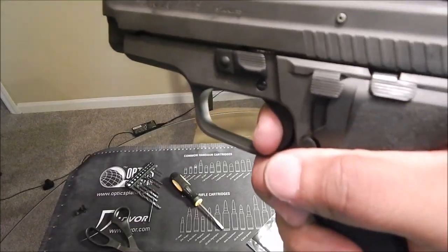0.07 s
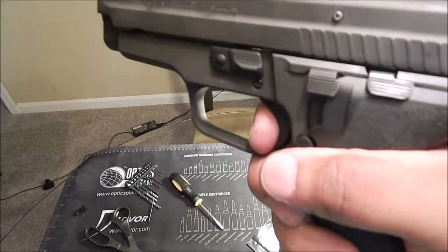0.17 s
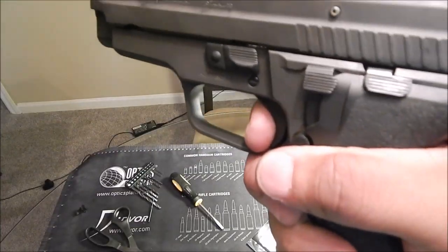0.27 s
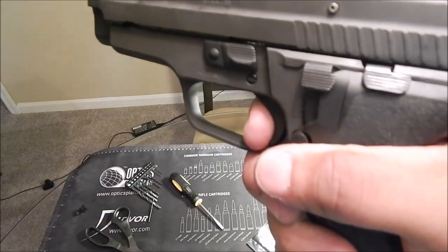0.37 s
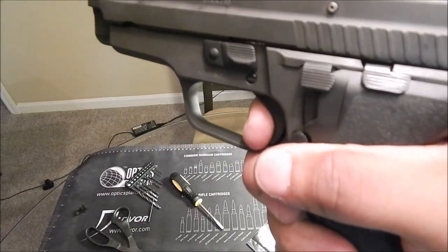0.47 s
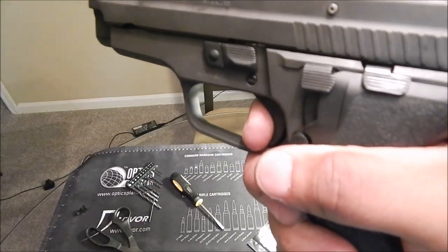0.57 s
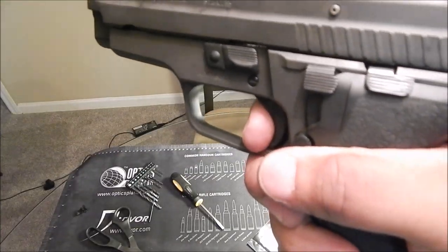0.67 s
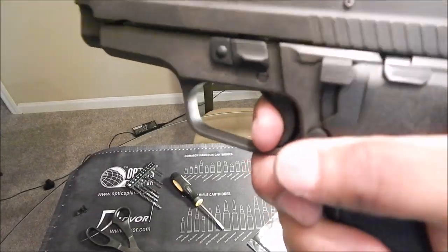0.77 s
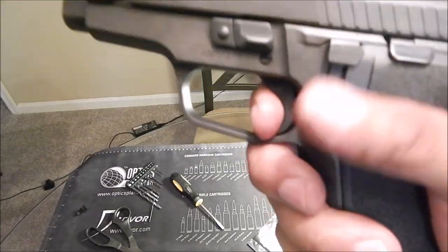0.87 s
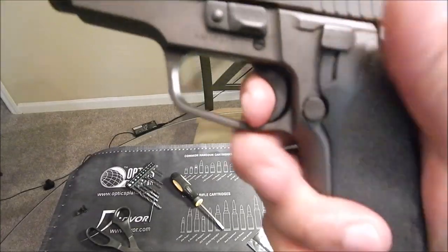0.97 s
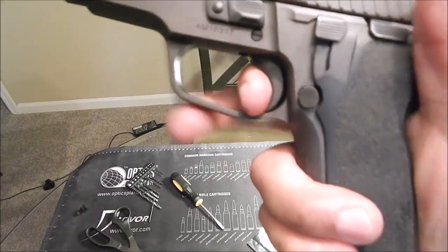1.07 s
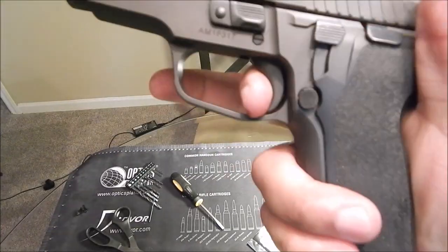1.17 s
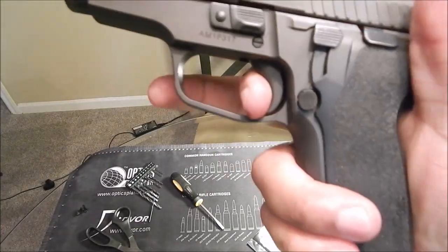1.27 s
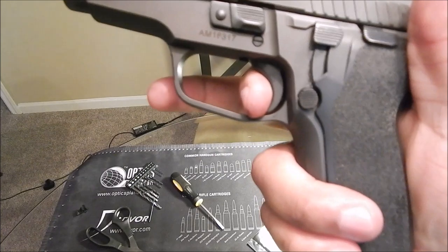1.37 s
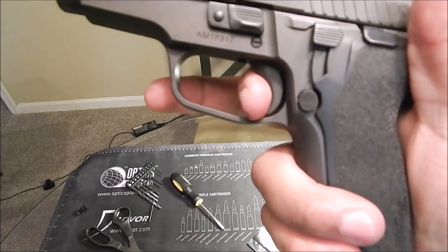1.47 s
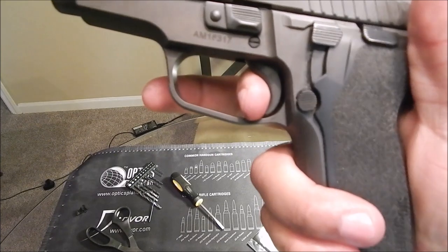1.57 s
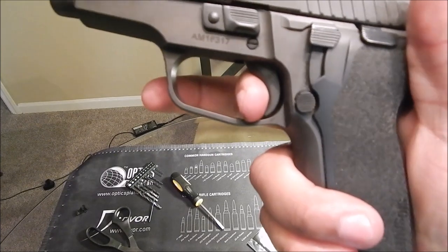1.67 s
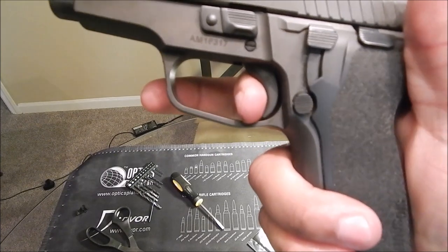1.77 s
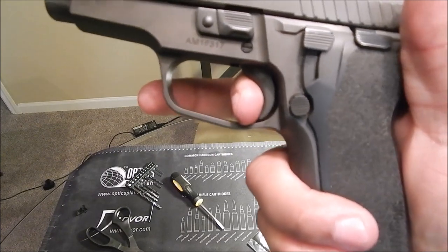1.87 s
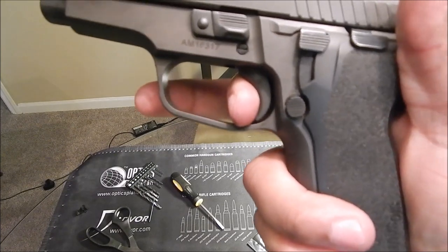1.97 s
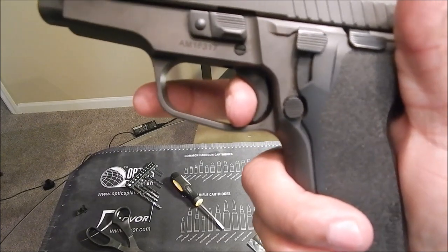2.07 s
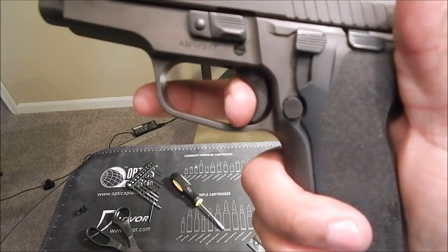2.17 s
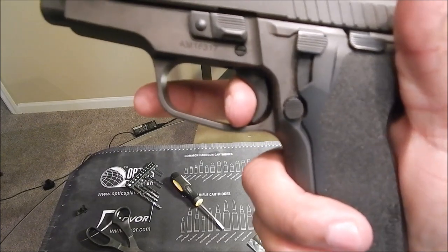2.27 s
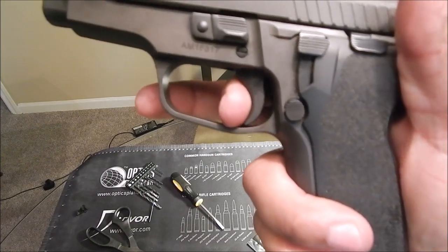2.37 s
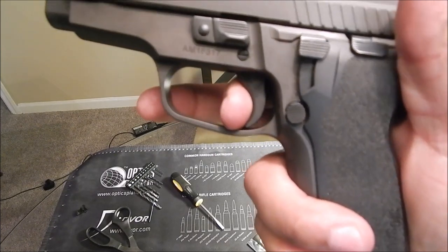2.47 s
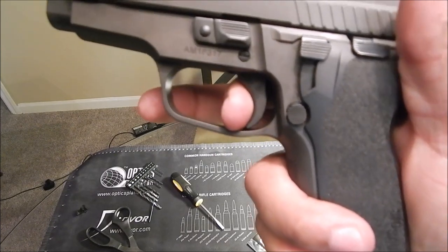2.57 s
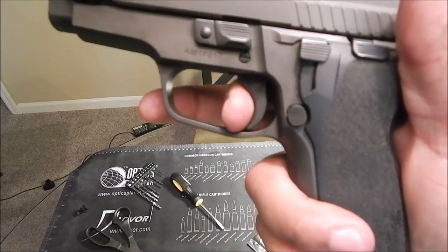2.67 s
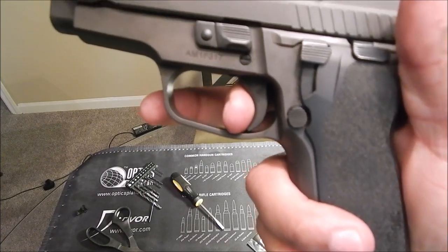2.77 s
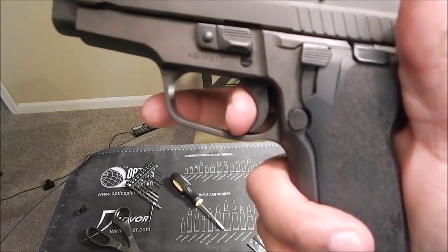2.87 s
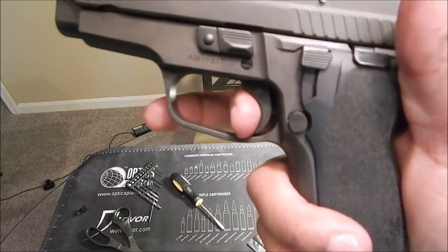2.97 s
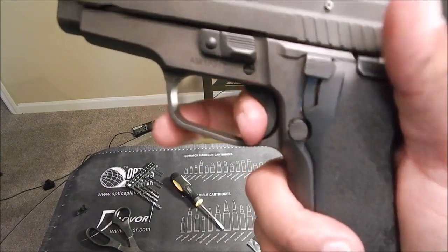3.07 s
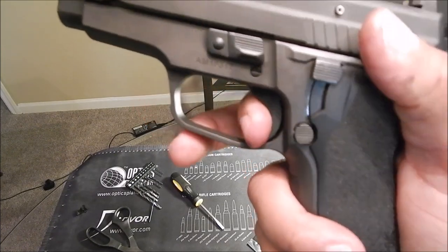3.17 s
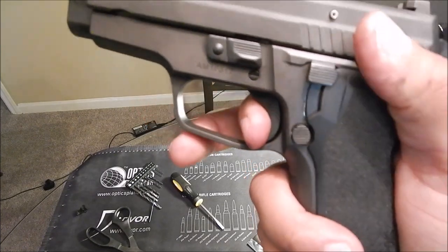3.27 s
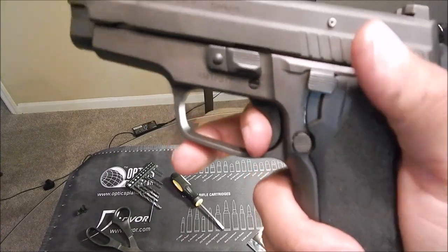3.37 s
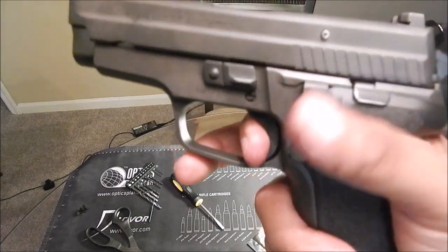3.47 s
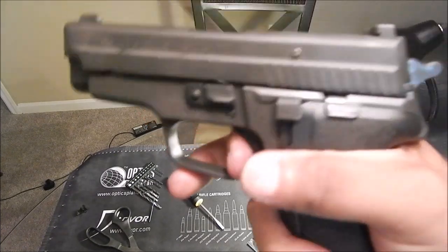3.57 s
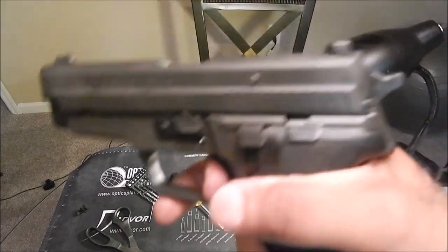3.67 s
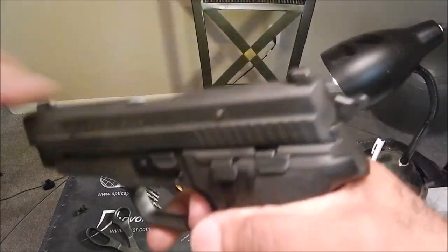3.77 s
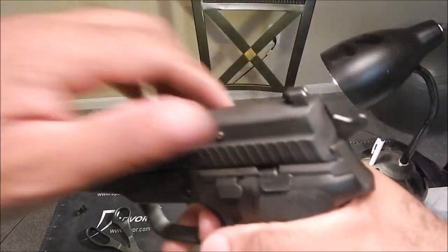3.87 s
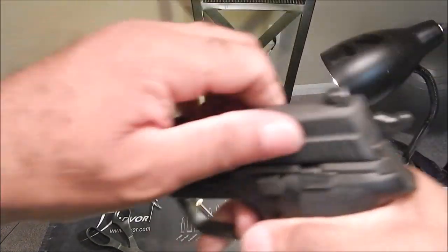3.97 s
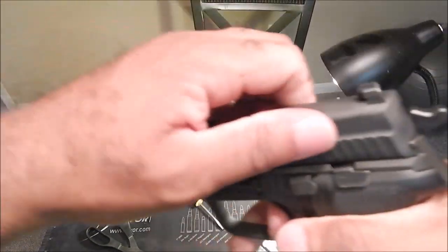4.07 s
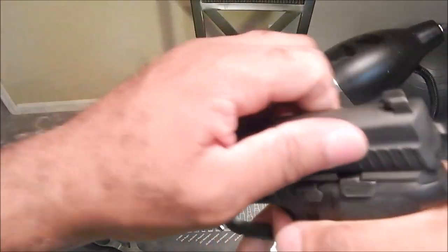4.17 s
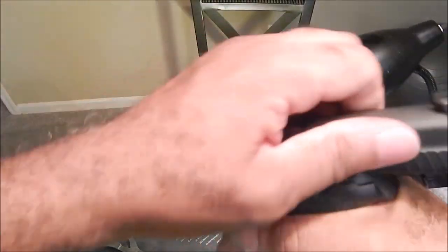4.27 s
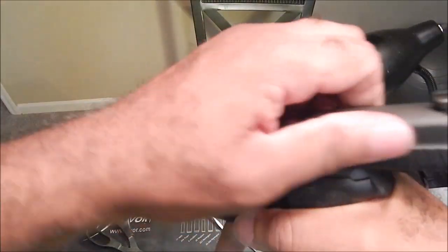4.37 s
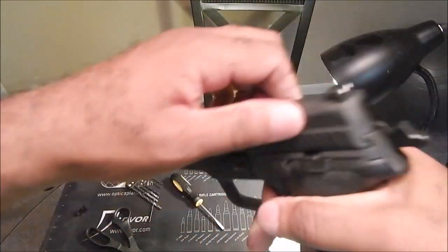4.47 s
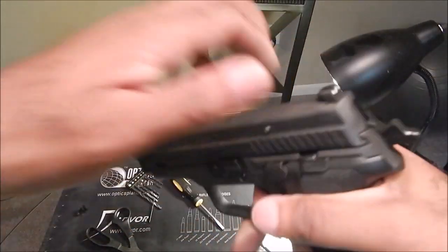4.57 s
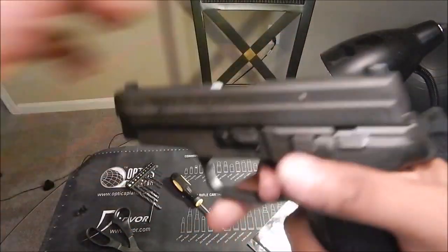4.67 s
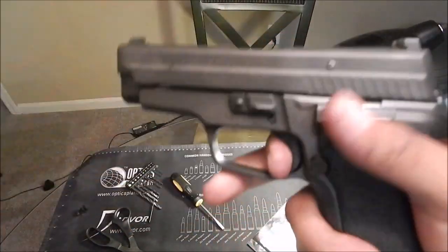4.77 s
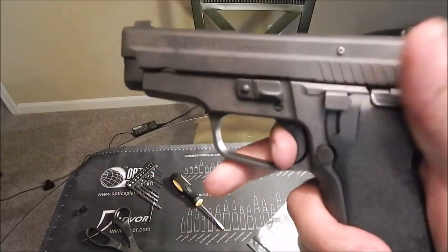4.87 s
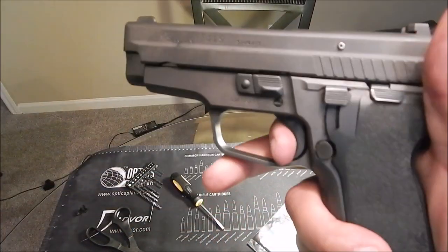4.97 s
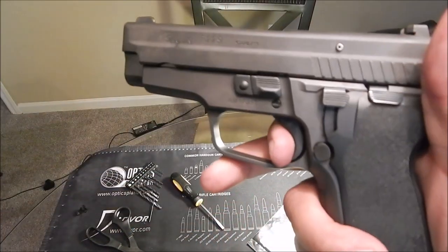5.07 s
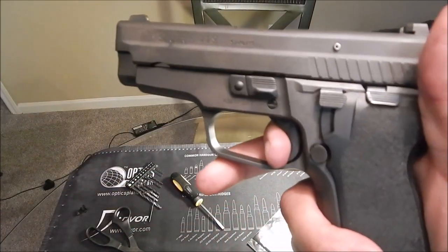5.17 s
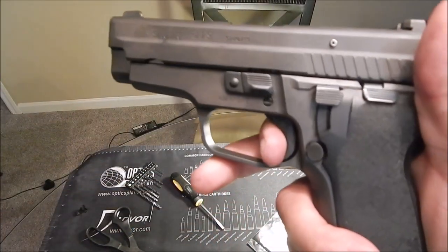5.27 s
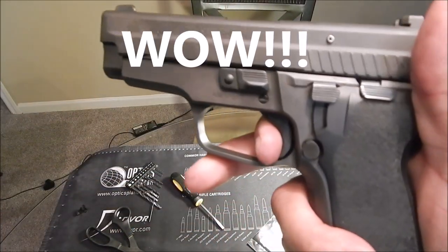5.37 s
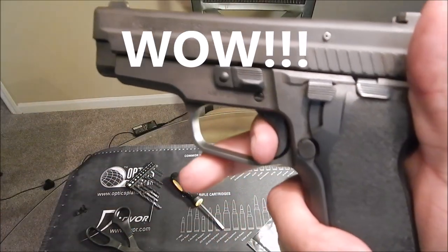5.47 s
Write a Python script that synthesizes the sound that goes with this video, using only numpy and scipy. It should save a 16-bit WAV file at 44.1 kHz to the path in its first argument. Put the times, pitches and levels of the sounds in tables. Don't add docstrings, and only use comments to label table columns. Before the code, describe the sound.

A stereo close-up of a pistol being dry-fired and racked in a small carpeted room. Low ventilation rush, a steady low hum and faint hiss slowly rise during the opening second. A soft, textured palm rub comes at 0.9 to 1.0 s, then fainter dragging from 1.4 to 2.2 s. At 2.27 s the hammer falls: a very sharp, dry steel crack with tight double contact and short room tail. A tiny trigger reset click follows at 2.93 s, then a second crack at 3.06 s, with more bounces, small late ticks and fuller ringing. The background drops sharply afterward. From 4.16 s the slide knocks and rattles backward, slams into its stop at 4.29 s, scrapes faintly while held, and snaps shut at 4.47 s with bright metallic ringing. A barely audible finger touch fades from 4.6 to 4.95 s as the quiet room sound creeps back.

```python
import sys
import numpy as np
from scipy import signal
from scipy.fft import rfft, irfft
from scipy.io import wavfile
from scipy.ndimage import uniform_filter1d, minimum_filter1d

SR = 44100
rng = np.random.default_rng(int(sys.argv[2]) if len(sys.argv) > 2 else 0)


def put_to_file(sound):
    columns = np.atleast_2d(sound).T
    safe = np.clip(columns, -1, 1)
    whole_steps = np.round(safe * 32767)
    wavfile.write(sys.argv[1], SR, whole_steps.astype(np.int16))


def makeup_ratio(level_db):
    decades = np.asarray(level_db, float) / 20
    return 10 ** decades


N = 243431
TIME = np.arange(N) / SR

CONTACT_S = [
    [2.2725, 2.2731, 2.2752, 2.284],
    [2.9262],
    [3.0623, 3.0635, 3.0656, 3.0675, 3.0735, 3.098, 3.108],
    [4.1645, 4.1958, 4.1985, 4.2035, 4.2615],
    [4.2936, 4.2958, 4.2985],
    [4.4653, 4.4672, 4.4695],
]


def pistol():
    fall_a_s, reset_s, fall_b_s, back_s, stop_s, home_s = CONTACT_S
    out = hammer_fall_a(fall_a_s)
    out += trigger_reset(reset_s)
    out += hammer_fall_b(fall_b_s)
    out += slide_back(back_s)
    out += slide_stop(stop_s)
    out += slide_home(home_s)
    return out + scrapes()


# [f/Hz, level/dB, t60/s]
FALL_A_HITS = [
    (-16.5, 14, 1.5, 1.5),
    (-15, 5.6, 5.5, 0),
    (-26.5, 30, -2.5, -1),
    (-34.5, 20, -3.5, 1),
]
FALL_A_TONE = [(350, -34.5), (600, -8), (1090, -12), (1670, -7.5), (2300, -4), (3400, -3.5), (3960, -4),
               (5290, -6), (5910, -13), (7700, -12), (12000, -9.5), (15800, -20.5), (16500, -40)]
FALL_A_TAIL = [(530, -36), (900, -15), (1050, -4), (1750, -10.5), (1950, -5.5), (3910, -1), (5610, -8.5),
               (11600, -5), (16000, -16.5)]
FALL_A_MODES = [(1060, -19, 0.016), (2118, 4, 0.032), (3780, -7, 0.025), (5000, -11, .03),
                (11500, -17, 0.018)]


def hammer_fall_a(times_s):
    return blow(times_s, FALL_A_HITS, FALL_A_TONE, FALL_A_TAIL, FALL_A_MODES,
                ring_db=-14.5, wet_db=-32.5, stretch=0.94)


RESET_HITS = [
    (-50.5, 23, -1, 0),
]
RESET_TONE = [(880, -28), (1500, -2), (4570, -17), (5200, -8), (8260, -22), (12100, -13), (16500, -31)]


def trigger_reset(times_s):
    return blow(times_s, RESET_HITS, RESET_TONE, FALL_B_TAIL, [], ring_db=-40, wet_db=-27.5, stretch=0.57)


FALL_B_HITS = [
    (-16.5, 11, -1.5, -0.5),
    (-15, 3.8, -1.5, 2),
    (-22, 24, -1, -3),
    (-21.5, 11, -6, 4.5),
    (-34.5, 14, -5, 0),
    (-39, 27, -3, 2),
    (-38, 16, -3, 0.5),
]
FALL_B_TONE = [(150, -38), (250, -8), (1470, -4.5), (1940, -7.5), (2160, -3), (3290, -4.5), (3780, 2.5),
               (4130, -5), (5190, -2.5), (8330, -8.5), (11200, -2.5), (15100, -12), (16500, -23)]
FALL_B_TAIL = [(290, -53), (500, -29), (530, -12), (868, -16.5), (1080, -14.5), (2190, -4), (5550, -5.5),
               (10500, -0.5), (16000, -10.5)]
FALL_B_MODES = [(414, -8, 0.02), (1060, -8.5, .1), (1440, -1.5, 0.023), (1793, -4.5, .025),
                (2140, -1.5, 0.05), (2302, -11, 0.11), (3637, -1, 0.03), (10000, -2, 0.044)]


def hammer_fall_b(times_s):
    return blow(times_s, FALL_B_HITS, FALL_B_TONE, FALL_B_TAIL, FALL_B_MODES,
                ring_db=-20, wet_db=-34.0, stretch=0.91)


BACK_HITS = [
    (-41.5, 25, -1.5, -1.8),
    (-19, 10, -5.5, -0.5),
    (-30, 59, 5.5, 0.83),
    (-27.5, 11, -17, -0.81),
    (-31, 29, -6, 4.5),
]
BACK_TONE = [(180, -41), (300, -14), (1580, -8.5), (1870, -5.5), (2520, -11.5), (3770, -6.5), (5830, -6),
             (6450, -6.5), (7380, -5.5), (8160, -10.5), (11800, -1.5), (15400, -21.5), (16500, -28)]
BACK_TAIL = [(290, -44.5), (500, -10.5), (1870, -0.5), (2040, -5), (3750, 0), (5470, -9), (7100, 0.5),
             (14200, -4), (16000, -19)]
BACK_MODES = [(1900, -8, 0.078), (7160, -5, 0.092), (7350, -5.5, 0.09), (10140, 6.5, .03)]


def slide_back(times_s):
    return blow(times_s, BACK_HITS, BACK_TONE, BACK_TAIL, BACK_MODES,
                ring_db=-16.5, wet_db=-25.5, stretch=1.0)


STOP_HITS = [
    (-16, 18, -4, -0.83),
    (-31, 5.6, -4, -0.4),
    (-34, 38, -2, 1),
]
STOP_TONE = [(290, -49), (500, -15), (753, -12), (1050, -12), (1590, -6.5), (1840, -3), (2160, -6.5),
             (3770, 2.5), (4970, -21.5), (7270, -3.5), (12000, -5), (15300, -16), (16500, -40.5)]
STOP_TAIL = [(290, -41.5), (500, -12), (868, -11.5), (1770, -1), (2100, -5), (2980, -5), (10200, -6.5),
             (14200, -9.5), (16000, -42.5)]
STOP_MODES = [(384, -13.5, 0.028), (1080, -7.5, 0.13), (1400, -5, 0.067), (1842, -4.5, .04),
              (2480, -6, 0.029), (3140, 1, 0.046), (3870, -2.5, .04), (7170, -6.5, 0.095),
              (9250, -3.5, .06), (10400, -2, 0.021)]


def slide_stop(times_s):
    return blow(times_s, STOP_HITS, STOP_TONE, STOP_TAIL, STOP_MODES,
                ring_db=-18, wet_db=-25.5, stretch=0.82)


HOME_HITS = [
    (-20, 20, -11, 0.9),
    (-26, 4.9, 11, 0.93),
    (-24.5, 35, -3.5, -1),
]
HOME_TONE = [(260, -27.5), (450, 0.5), (1050, -9), (1250, -13.5), (2360, 1.5), (3710, -4.5), (4720, -0.5),
             (5170, -9.5), (6990, 1), (8760, -2), (9740, 0.5), (15800, -12), (16500, -34)]
HOME_TAIL = [(290, -46.5), (500, -20), (659, 1), (729, -17.5), (1050, 2), (4730, -4.5), (5090, -6),
             (9770, 1), (16000, -12)]
HOME_MODES = [(400, -5.5, .025), (1340, -5, 0.14), (1540, -17.5, .3), (4830, -3, 0.05), (7040, 5.5, .05),
              (7160, -20, .25), (10070, -3, .05)]


def slide_home(times_s):
    return blow(times_s, HOME_HITS, HOME_TONE, HOME_TAIL, HOME_MODES,
                ring_db=-18, wet_db=-28.5, stretch=0.92)


# [start t/s, landing t/s, start level/dB, landing level/dB]
SCRAPES = [
    (2.259, 2.271, -44.5, -39.5),
    (3.05, 3.061, -42, -39),
    (4.135, 4.16, -77, -66.5),
    (4.166, 4.194, -50, -41),
    (4.262, 4.269, -44.5, -44),
    (4.36, 4.448, -57, -56.5),
    (4.452, 4.464, -42.5, -39.5),
]
# [f/Hz, level/dB per Hz]
SCRAPE_TONE = [(240, -38.5), (400, -8.5), (1390, -2.5), (3650, -5), (4070, -8), (4530, -4.5), (10200, -5.5),
               (15500, -11.5), (16500, -29)]


def scrapes():
    gain = strokes(SCRAPES, rise_db_s=2200, fall_db_s=7000)
    return gain * diffuse(N + 1, SCRAPE_TONE, spiky_db=2.0)[:, :N]


def blow(times_s, hits, tone, tail, modes, ring_db, wet_db, stretch):
    start, size, brief = int(times_s[0] * SR), 24576, 4096
    sound, ticks = np.zeros((2, size)), np.zeros(size)
    for s, (db, t60_ms, pan_db, tilt_db) in zip(times_s, hits):
        at = int(s * SR) - start
        t60_ms = max(t60_ms, 1)
        tilted = [(hz, d + tilt_db * np.log2(hz / 4000)) for hz, d in tone]
        level_db = db - 2.5 + np.array([[pan_db], [-pan_db]]) / 2
        sound[:, at:at + brief] += colour(chatter(brief, t60_ms), tilted) * makeup_ratio(level_db)
        ticks[at + 8] = makeup_ratio(db) * np.sqrt(t60_ms / 15)
    sound += ringing(ticks, modes, ring_db)
    out = np.zeros((2, N + size))
    out[:, start:start + size] = sound + makeup_ratio(wet_db) * room(ticks, tail, stretch)
    return out[:, :N]


def chatter(size, t60_ms):
    age_s = np.arange(size) / SR
    direct = rng.standard_normal(size) * makeup_ratio(0.67 * rng.exponential(size=size))
    noise = 0.69 * np.array([np.roll(direct, 2), direct])
    noise = noise + 0.82 * diffuse(size, [(100, 0.0054), (16000, 0.0022)])
    out = (1 - np.exp(-age_s / 0.00015)) * makeup_ratio(-60e3 * age_s / t60_ms) * noise
    out[:, [10, 8]] += 0.73 * np.eye(2)
    return out


def ringing(ticks, modes, ring_db):
    out = np.zeros((2, len(ticks)))
    for hz, db, t60_s in modes:
        pole = np.exp(2j * np.pi * hz / SR - np.log(1000) / (t60_s * SR))
        phase = np.exp(2j * np.pi * rng.random((2, 1)) * min(hz / 12000, .45))
        out += makeup_ratio(ring_db + db) * (phase * signal.lfilter([1], [1, -pole], ticks)).imag
    return out


# [f/Hz, t60/s]
ROOM_T60 = [(250, 0.14), (700, 0.49), (1500, 0.51), (3000, 0.58), (6000, 0.52), (10000, 0.44),
            (13000, 0.41), (16000, .2)]


def room(ticks, tail, stretch):
    size = len(ticks)
    spectrum, out = rfft(diffuse(size, tail)), 0
    ripple = uniform_filter1d(rng.standard_normal(size // 2 + 1), size=40)
    spectrum = spectrum * makeup_ratio(2.6 * unit(ripple))
    octave = np.log2(np.arange(size // 2 + 1) * SR / size + 1)
    t = np.arange(size) / SR
    onset = ((1 - np.exp(-t / 0.00059)) * (1 + 1.3 * np.exp(-t / 0.018))) ** 2
    onset = onset * makeup_ratio(25 * t)
    for centre in np.arange(8, 14.4, 1 / 3):
        window = np.cos(np.pi / 2 * np.clip(3 * (octave - centre), -1, 1)) ** 2
        band = irfft(spectrum * window, size)
        t60_s = (.92 + .16 * rng.random()) * stretch * on_log(2 ** centre, ROOM_T60)
        decay = onset * makeup_ratio(-120 * t / t60_s)
        power = 0
        for at in np.flatnonzero(ticks):
            power = power + np.roll(decay, at) * (np.arange(size) >= at) * ticks[at] ** 2
        out = out + band * np.sqrt(power)
    return out


# [start t/s, end t/s, start level/dB, end level/dB]
PALM = [
    (.865, 1.035, -61.5, -61.5),
    (1.38, 1.4, -68, -77),
    (1.45, 1.7, -73, -73),
    (1.7, 2.24, -72, -69),
]
FINGER = [
    (3.405, 3.435, -80.5, -87.5),
    (4.62, 4.95, -74, -84.5),
]
# [f/Hz, level/dB per Hz]
PALM_TONE = [(600, -26), (1200, 2.5), (3000, 0), (8000, -5), (12000, -5), (16000, -10.5)]


def hands():
    rise_db_s, lift_db_s = 550, 310.5
    finger_tone = [(700, -36), (1000, -8.5), (2100, -9), (2800, -18), (4500, -61)]  # f/Hz, level/dB per Hz
    palm_gain = strokes(PALM, rise_db_s, lift_db_s) * makeup_ratio(1.1 * walk(40))
    palm = palm_gain * diffuse(N + 1, PALM_TONE)[:, :N]
    return palm + strokes(FINGER, rise_db_s, lift_db_s) * diffuse(N + 1, finger_tone)[:, :N]


# [f/Hz, level/dB per Hz]
VENT_TONE = [(15, -56.5), (25, -26.5), (53, -25), (104, -2), (119, -7), (130, -4.5), (184, -18), (231, -17),
             (265, -21), (291, -18), (401, -13.5), (516, -23.5), (579, -24.5), (2040, -35), (6000, -52),
             (7800, -86), (13200, -120)]


def ventilation():
    hum_hz, hum_db, vent_db = 120.6, -44, -42.5
    hum = np.sqrt(2) * np.sin(2 * np.pi * hum_hz * TIME + 0.1 * walk(3.7))
    hum = hum * makeup_ratio(hum_db + 0.65 * walk(4) + 2.0 * walk(16))
    return makeup_ratio(vent_db - 3.5 + 0.59 * walk(1.6)) * diffuse(N + 1, VENT_TONE)[:, :N] + hum


# [f/Hz, level/dB per Hz]
HISS_TONE = [(1000, -8.5), (4000, -5), (8000, 0), (12000, -3), (16000, -7)]


def hiss():
    return makeup_ratio(-74) * diffuse(N + 1, HISS_TONE)[:, :N]


# [t/s, level/dB]
DUCKS = [
    (0, -15.5),
    (2.299, -15.5),
    (3.1, -35.5),
    (4.225, -23.5),
    (4.5, -34),
]


def gain_control():
    creep_db_s, duck_db_s = 17.5, 699.5
    dips = [db + np.where(TIME > s, creep_db_s * (TIME - s), duck_db_s * (s - TIME)) for s, db in DUCKS]
    return makeup_ratio(np.minimum(np.min(dips, axis=0), 0))


def brief_dip(blow_s):
    dip_db, from_s, until_s, slope_db_s = -9, .0062, .0026, 4500
    away_s = np.maximum(blow_s - from_s - TIME, TIME - blow_s + until_s)
    return makeup_ratio(np.minimum(dip_db + slope_db_s * np.maximum(away_s, 0), 0))


def strokes(rows, rise_db_s, fall_db_s):
    levels_db = []
    for start_s, end_s, start_db, end_db in rows:
        drift_db = np.interp(TIME, [start_s, max(end_s, start_s + 1e-4)], [start_db, end_db])
        rise_db = rise_db_s * np.clip(start_s - TIME, 0, None)
        fall_db = fall_db_s * np.clip(TIME - end_s, 0, None)
        levels_db.append(drift_db - rise_db - fall_db)
    return makeup_ratio(np.max(levels_db, axis=0).clip(-200))


# [f/Hz, likeness/1]
LIKENESS = [(60, 1), (130, 0.97), (290, 0.91), (640, 0.79), (1410, 0.5), (3100, 0.2), (6820, -0.11),
            (15000, 0.4)]


def diffuse(size, tone, spiky_db=0.):
    hz = np.arange(size // 2 + 1) * SR / size
    alike = np.clip(on_log(hz, LIKENESS), -.99, .99)
    mid, side = rfft(rng.standard_normal((2, size)) * makeup_ratio(spiky_db * rng.exponential(size=size)))
    mid, side = mid * np.sqrt(1 + alike), side * np.sqrt(1 - alike)
    return unit(irfft(np.array([mid + side, mid - side]) * makeup_ratio(on_log(hz, tone)), size))


def colour(x, tone):
    cep = irfft(np.log(makeup_ratio(on_log(np.arange(1025) * SR / 2048, tone))))
    cep[1:1024] *= 2
    cep[1025:] = 0
    taps = irfft(np.exp(rfft(cep)))[:1024]
    taps = taps / np.linalg.norm(taps)
    return signal.fftconvolve(x, taps[None], axes=1)[:, :x.shape[1]]


def walk(rate_hz):
    k = int(SR / rate_hz)
    steps = np.repeat(rng.standard_normal(N // k + 1), k)
    return unit(uniform_filter1d(uniform_filter1d(steps, k), k)[:N])


def on_log(hz, table):
    table_hz, value = np.array(table).T
    return np.interp(np.log(hz + 1), np.log(table_hz), value)


def unit(x):
    return x / np.sqrt(np.mean(x ** 2))


def scene():
    slide_stop_s = CONTACT_S[4][0]
    return brief_dip(slide_stop_s) * pistol() + hands() + gain_control() * (ventilation() + hiss())


# [f/Hz, level/dB]
FAINTEST = [(300, -122), (600, -108), (1000, -103), (2000, -103), (3200, -107), (4500, -105), (8000, -106),
            (16000, -107)]


def drop_faint_lines(x):
    hz, _, lines = signal.stft(x, SR, "cosine", 2048, 1024)
    strongest = -minimum_filter1d(-np.abs(lines), size=5, axis=1)
    patchy = np.repeat(rng.standard_normal((65, lines.shape[2])), 16, axis=0)[:len(hz)]
    step = makeup_ratio(on_log(hz, FAINTEST)[:, None] + 4.8 * patchy)
    lines *= (strongest > step) & (np.abs(lines) > step * makeup_ratio(-5))
    return signal.istft(lines, SR, "cosine", 2048, 1024)[1][:, :N]


def roll_off(x):
    return signal.sosfilt(signal.butter(12, 16650, fs=SR, output="sos"), x)


def record(dry):
    round_off, top_hz, rounding_db = .25, 15800, -101
    x = round_off * np.tanh(dry / round_off)
    x = signal.sosfilt(signal.ellip(8, .3, 30, top_hz, fs=SR, output="sos"), x)
    x = drop_faint_lines(x)
    x = x + makeup_ratio(rounding_db) * rng.standard_normal(x.shape)
    return roll_off(x)


dry = scene()
out = record(dry)
put_to_file(out)
```